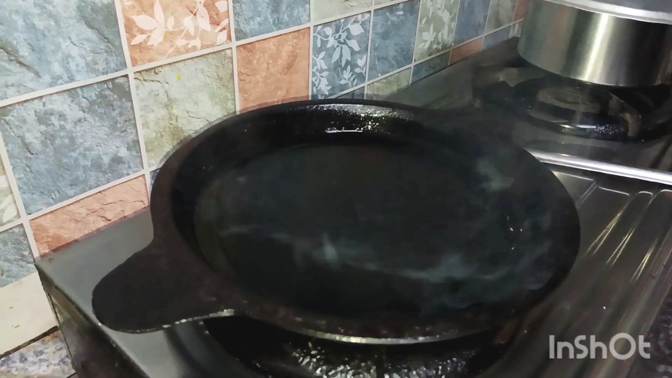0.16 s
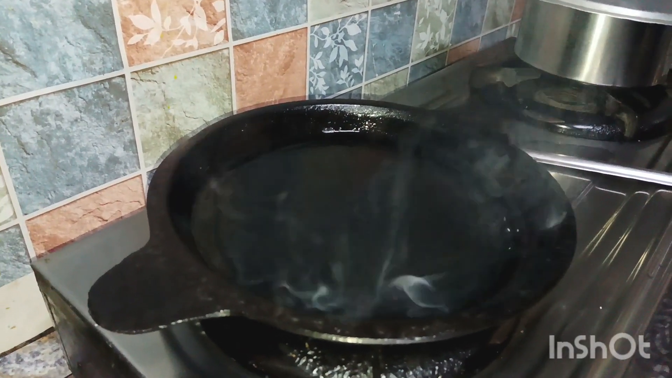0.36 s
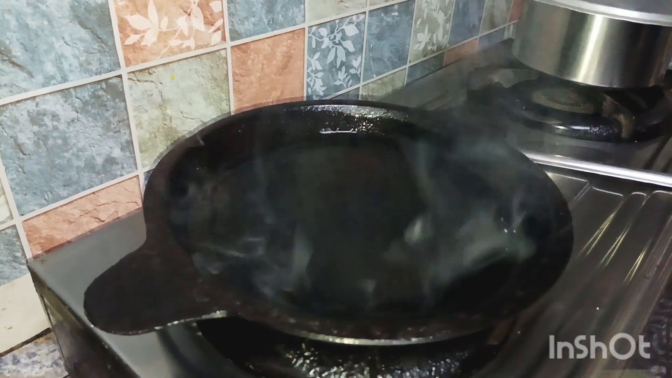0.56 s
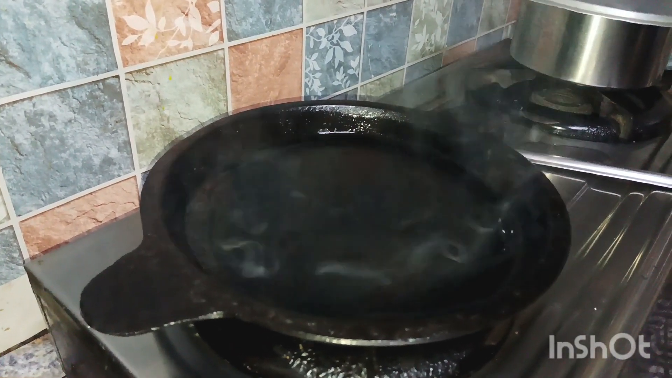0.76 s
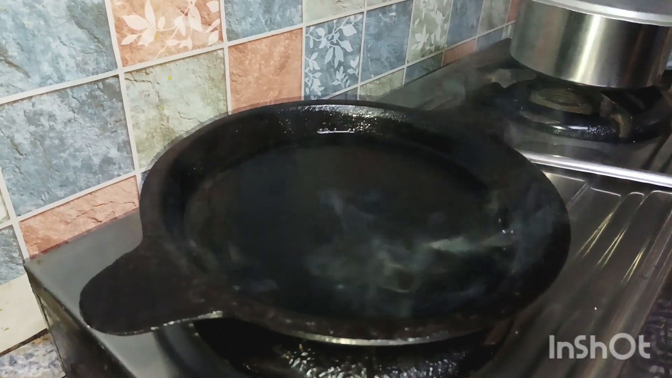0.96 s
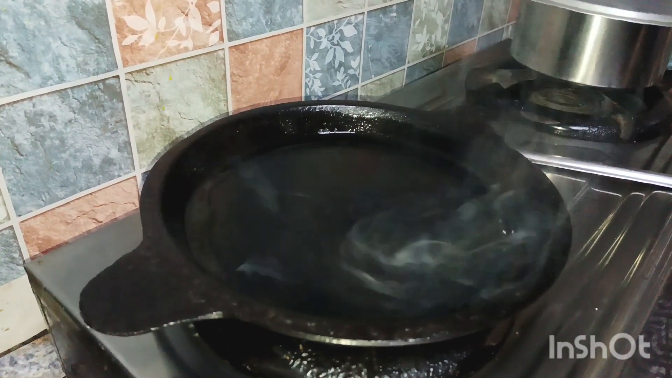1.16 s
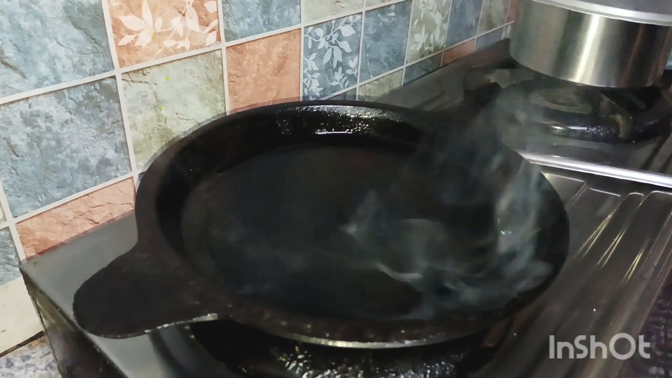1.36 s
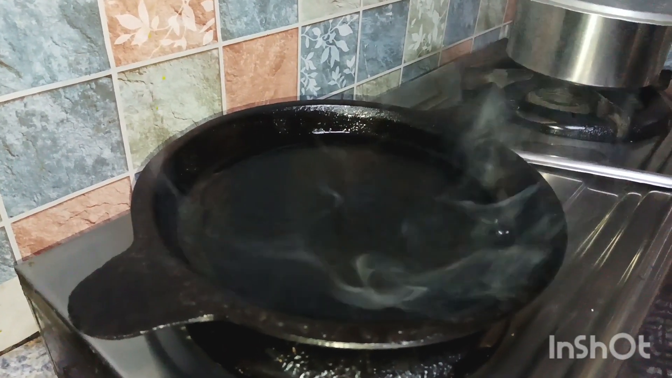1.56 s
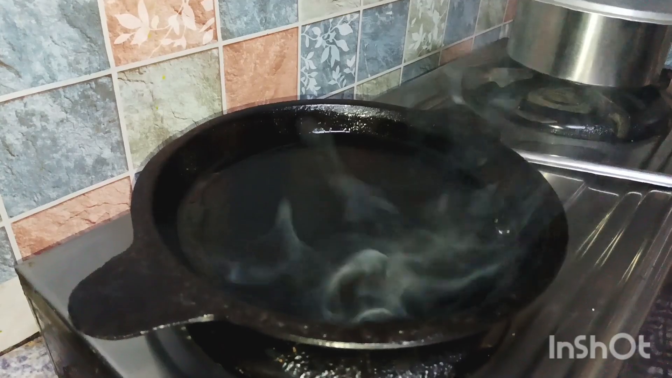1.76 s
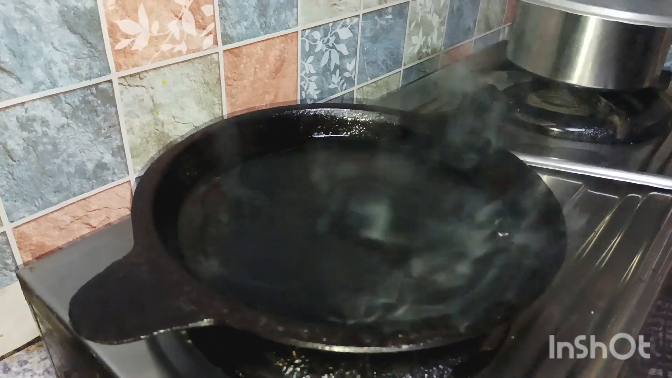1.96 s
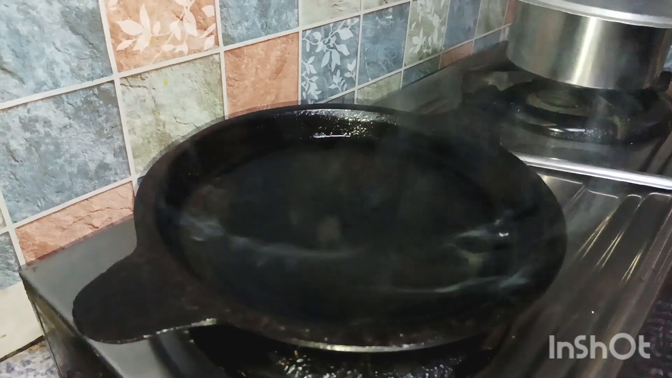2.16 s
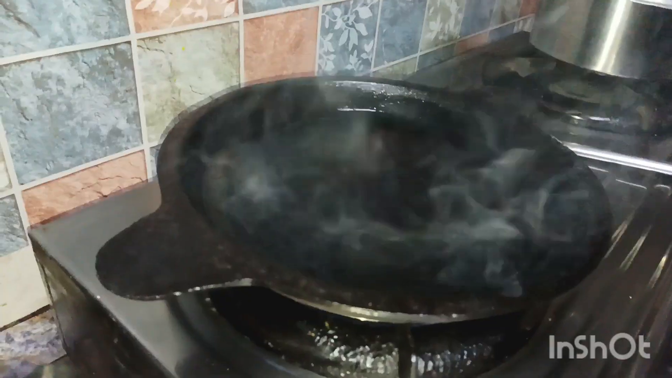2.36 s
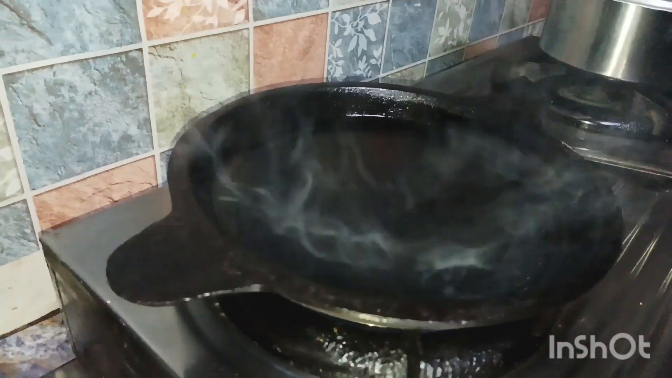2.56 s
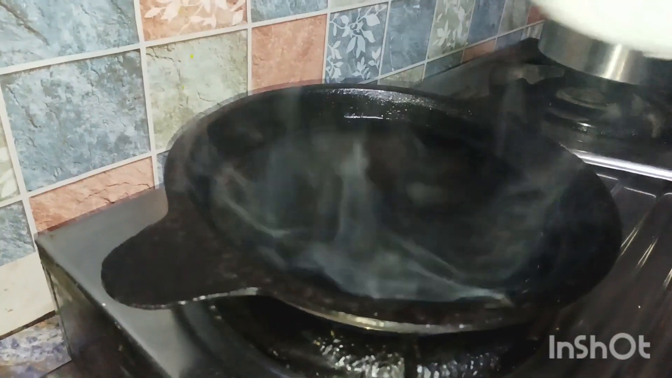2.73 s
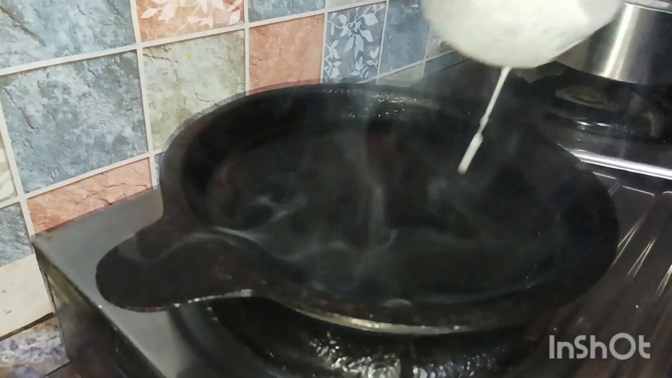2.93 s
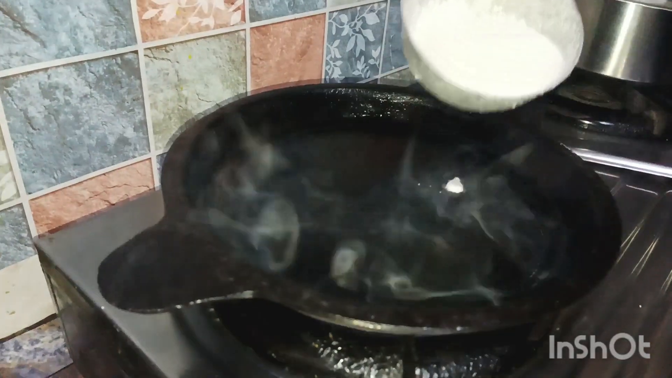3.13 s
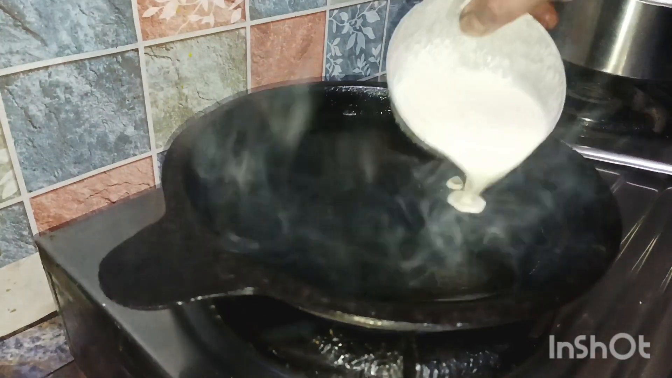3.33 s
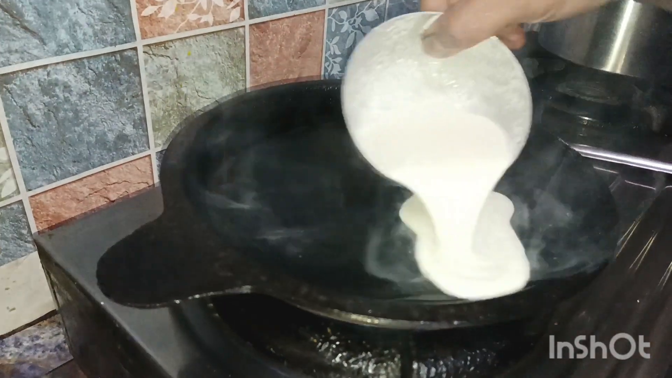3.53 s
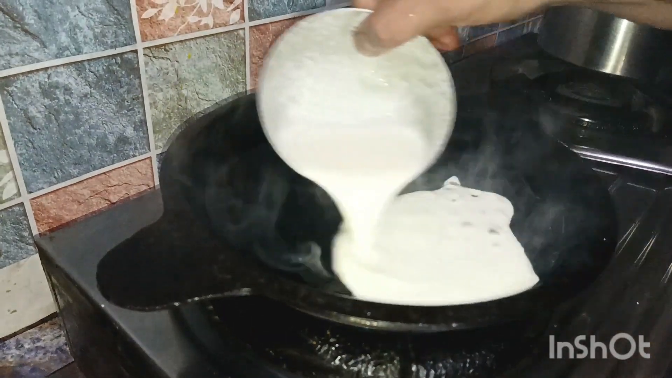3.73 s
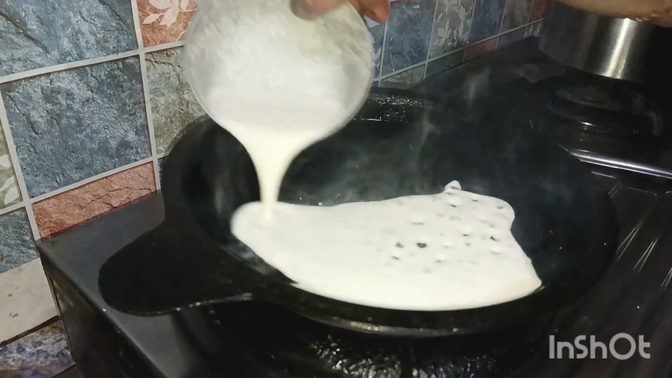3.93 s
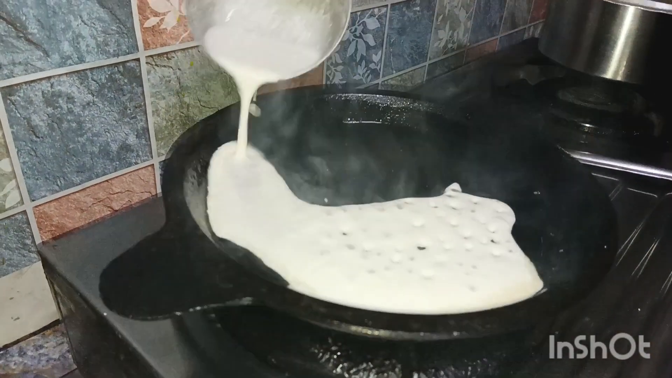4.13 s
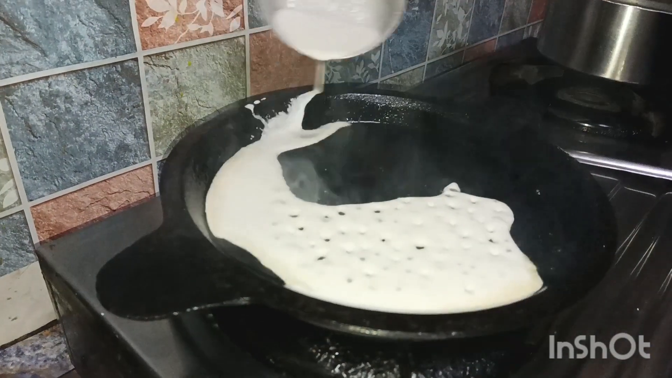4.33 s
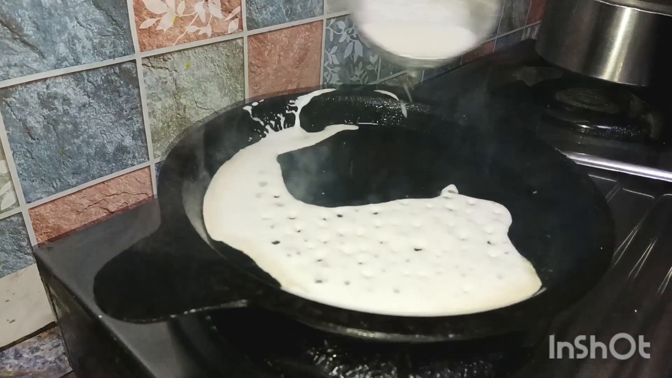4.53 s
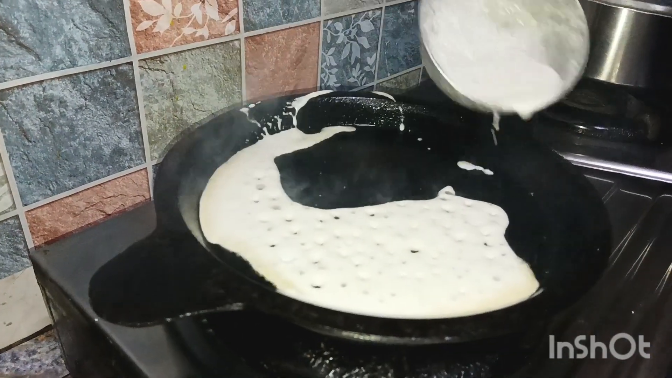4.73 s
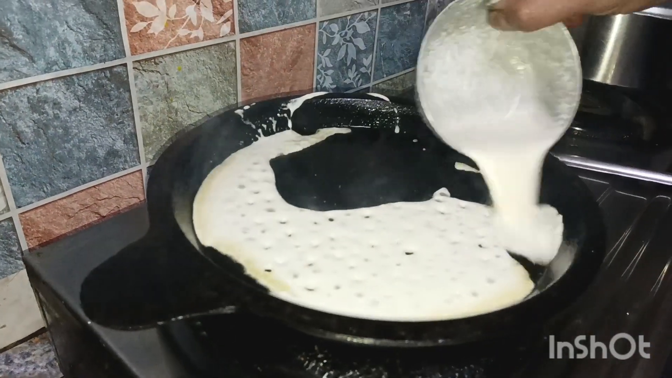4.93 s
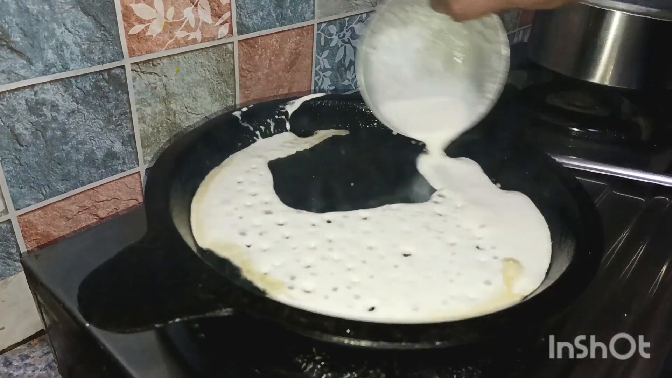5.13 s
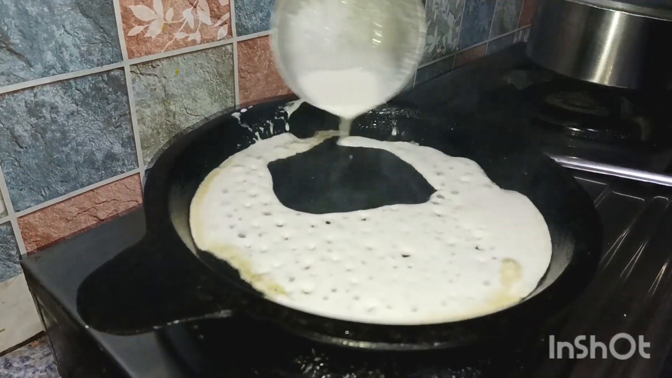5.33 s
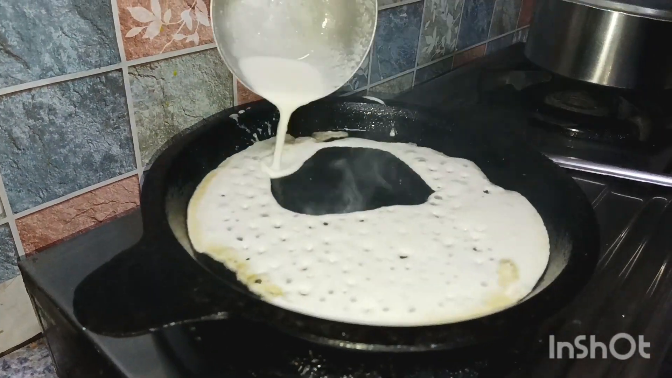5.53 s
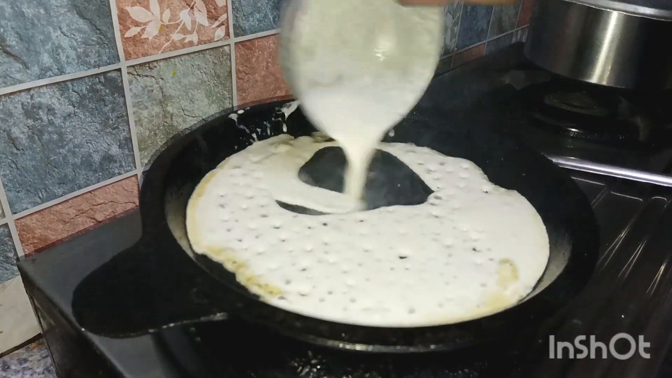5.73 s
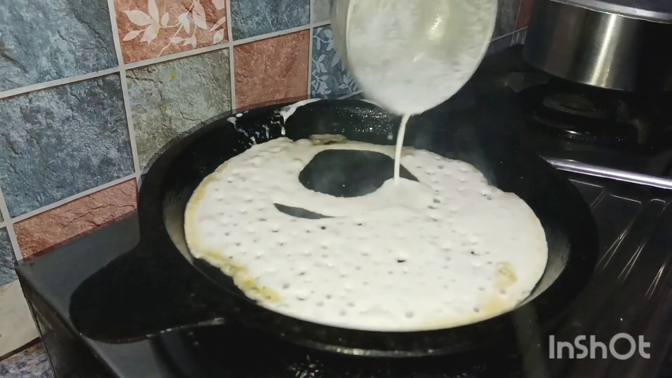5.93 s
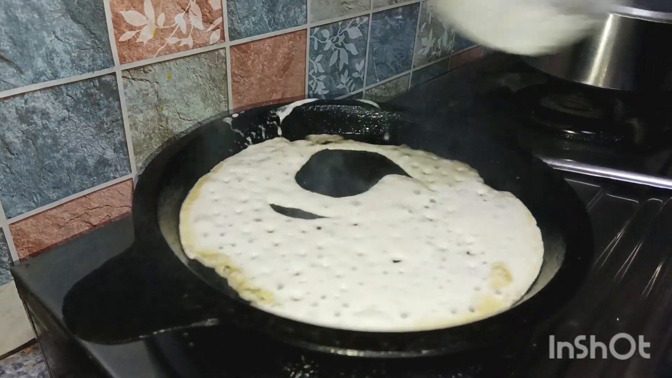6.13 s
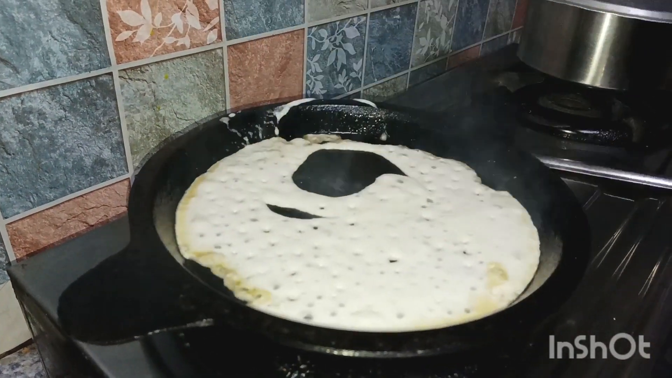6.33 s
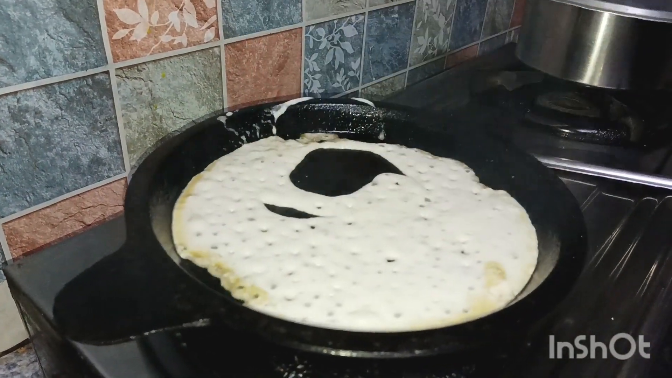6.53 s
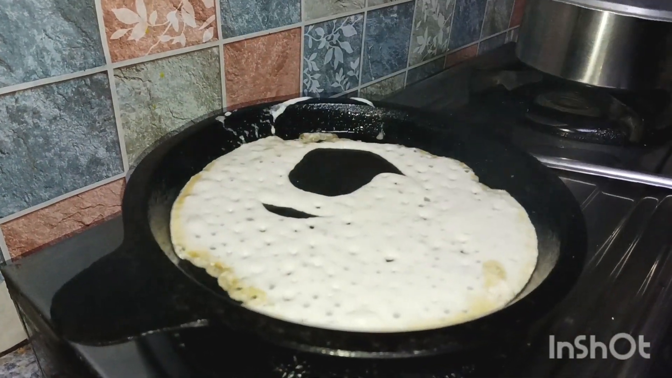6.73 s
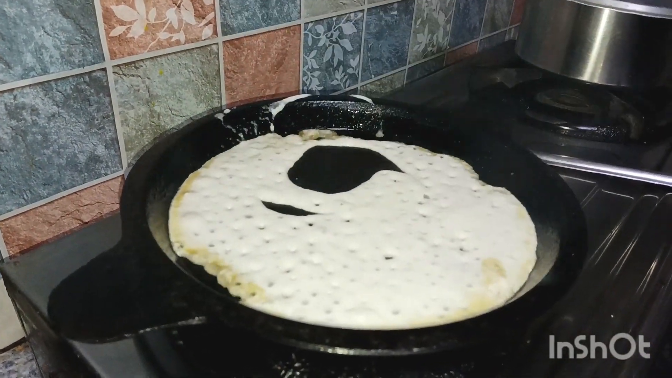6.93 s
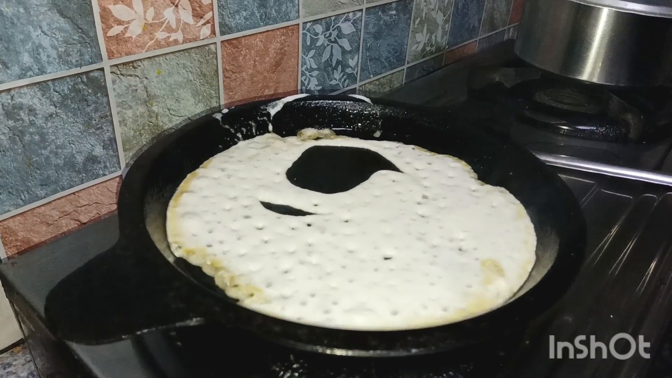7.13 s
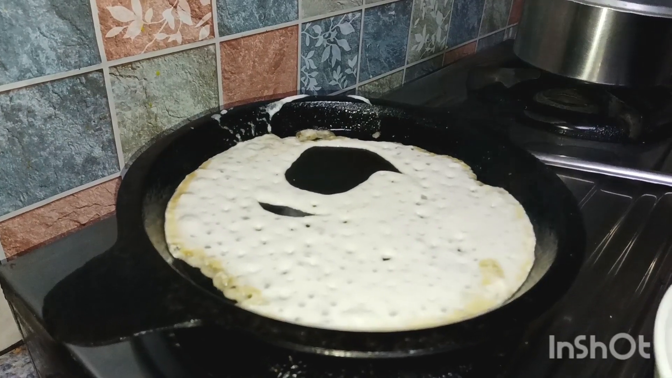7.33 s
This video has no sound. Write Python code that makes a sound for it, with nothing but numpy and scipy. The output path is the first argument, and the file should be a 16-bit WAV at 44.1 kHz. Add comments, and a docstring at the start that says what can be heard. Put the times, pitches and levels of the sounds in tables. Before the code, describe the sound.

For the first 2.5 seconds a quiet kitchen bed is heard: a steady low motor hum, the soft midrange rush of a gas flame with a restless rumble and occasional dull throbs, and very faint fizzing of oiled iron, slightly livelier near 0.9 and 2 s. Around 2.6 s a first tiny splash hisses briefly. At about 2.95 s a drop flashes into a sharp, ringing hiss, and from 3.3 s poured batter sizzles loudly, fine high spitting first, then denser frying and lower bubbling. It subsides through 4 to 4.5 s. A second round of pouring raises fresh sizzles from 4.5 to about 5.6 s, with short steam spurts. From 6 s the sizzle thins into a calming crackle over the flame and hum, with tiny clicks and, around 6.6 to 7.3 s, small light knocks. The sound is close, with short bright reflections from tiles.

```python
"""A motor hums and a gas burner rushes as sums of sines and shaped noise; oiled iron fizzes faintly.
A first splash hisses briefly; then batter is poured on in two rounds and sizzles loudly, calming as it sets.
At each wetting random bubble bursts, shaped into bands, flash and then simmer, the tiniest starting first.
Very short sine clicks and short filtered noise bursts punctuate the sizzle.
Tiles echo the bubbles, and the gap behind the griddle rings."""
import sys
import numpy as np
from scipy import signal
from scipy.fft import rfft, irfft, next_fast_len
from scipy.io import wavfile
from scipy.ndimage import uniform_filter1d, map_coordinates

SR = 44100
rng = np.random.default_rng(int(sys.argv[2]) if len(sys.argv) > 2 else 0)


def file_out(sig):
    """Save sig as 16-bit WAV at sys.argv[1]."""
    # one column per channel
    cols = np.atleast_2d(sig).T
    # limit, then scale
    lim = np.clip(cols, -1, 1)
    pcm = np.round(lim * 32767).astype(np.int16)
    wavfile.write(sys.argv[1], SR, pcm)


N = 329868

# motor tones: f/Hz, rms level/dB, waver/dB
MOTOR_TONES = [(98.7, -55.5, 0.5), (219.6, -39.5, 0.85), (439, -60.5, 3.5), (660, -51.5, 1.1)]
# relative spectrum of the flame's rush: f/Hz, density/dB
FLAME_SPECTRUM = [(100, -70), (400, -22), (600, -12), (690, -5.5), (790, 2), (920, -4), (1160, -11),
                  (1400, -13), (1550, -8.5), (1680, -12), (1900, -7), (2700, -7), (2950, -9.5), (3750, -12),
                  (4050, -20), (4800, -25), (6200, -24.5), (8300, -32), (10200, -40.5), (15800, -50)]
# relative spectrum of the burner's rumble: f/Hz, density/dB
RUMBLE_SPECTRUM = [(25, -47), (48, -33), (70, -14.5), (100, -9.5), (135, -15), (160, -9), (185, -0.5),
                   (212, -2.5), (255, -17), (310, -12.5), (400, -21), (490, -26.5), (580, -23), (700, -52)]
# soft low throbs of the fluttering flame: t/s, rms level at the crest/dB
FLAME_THROBS = [(.79, -34), (1.41, -41), (1.66, -41), (1.841, -39), (2.94, -42), (3.55, -35), (3.98, -34),
                (4.74, -37), (6.28, -37)]
# moments when the oil fizzes more: t/s, rise of the driving level/dB, Gaussian half-length/s
OIL_FLARES = [(.85, 5, .04), (1.38, 2.5, .2), (2.02, 5, 0.13)]
# relative spectrum of the sizzle: f/Hz, density/dB
SIZZLE_SPECTRUM = [(400, -14), (560, -12.5), (760, -6.5), (1000, -7), (1500, 1), (3000, -2), (3700, -3),
                   (4600, -8.5), (5300, -6.5), (6200, -3), (7500, -3.5), (8400, -6.5), (9400, -13.5),
                   (13500, -18), (15800, -19.5)]
# short noise bursts, steam hisses and late knocks perhaps of the bowl being handled:
# t/s, rms level at the crest/dB, f/Hz, resonance width/Hz, Gaussian half-length/s
NOISE_SPURTS = [(3.054, -31, 3170, 148, 0.05), (3.12, -42, 1590, 493, 0.044),
                (3.304, -35.5, 700, 44.8, 0.15), (4.597, -34, 8500, 4000, 0.028),
                (4.679, -36, 5750, 250, 0.096), (4.68, -45, 8900, 250, 0.12),
                (5.372, -26.5, 1420, 202, 0.028), (6.642, -31.5, 3500, 4000, .04),
                (6.985, -32.5, 6200, 1500, .008), (7.007, -32, 3100, 900, 0.025),
                (7.195, -29, 6000, 6000, 0.006), (7.242, -32, 2500, 2030, 0.039),
                (7.271, -29.5, 5550, 4530, 0.016)]
# very short clicks of tiny bubbles, mostly high: t/s, level before a common gain/dB, f/Hz, decay time/s
BUBBLE_POPS = [(1.759, -18.5, 2600, 0.0001), (4.7838, -15, 7240, 0.00028), (5.4595, -20, 10400, .0003),
               (6.7895, -26, 12500, .0005), (6.8445, -23, 14000, 0.00018), (7.025, -22, 7000, .0002)]
# batter wetting fresh hot iron: t/s, strength/dB, spreading time/s, largest bubbles over smallest/dB
WETTINGS = [(2.57, -16, 0.042, -14.5), (2.933, 4, 0.19, .5), (3.304, 0.84, 0.14, -0.5),
            (3.69, -8.8, 0.086, 10), (4.515, -3.5, 0.14, -2.5), (4.686, -10, 0.12, 13),
            (4.967, -6.5, 0.16, 11), (5.118, -10.5, .031, 2.5), (5.263, -2.5, .17, -4.5),
            (5.587, -13, .073, -8), (6.148, -20, .07, -3)]
# driving level of each bubble size, from smallest to largest:
# delay/s, flash level/dB, flash power decay/s, simmer level/dB, simmer power decay/s
SPIT_RESPONSE = (0, -27.5, 0.1, -38.7, 1.53)
FIZZ_RESPONSE = (0.0357, -16.5, 0.113, -34, 2)
FRY_RESPONSE = (0.03, -18.5, 0.14, -32.4, 1.34)
BOIL_RESPONSE = (0.12, -29, 0.2941, -40, 1.9)
# resonances between griddle and tiles: f/Hz, width/Hz, lift at the first drop/dB, lift for spread batter/dB
GAP_RESONANCES = [(700, 26, 10, -3), (802, 17, 9, 4.5), (1385, 24, 2, 1.5), (1553, 31, 3, 3),
                  (1808, 32, 2, 7), (1980, 24, -14, 5), (2077, 24, 13.5, 0.5), (2350, 16, 7.5, 2.5),
                  (2535, 39, 7.5, -5), (2742, 78, 0, 4.5), (2950, 77, -1, 3.5), (3090, 65, 9.5, 4.5),
                  (3570, 45, 6, -4), (4300, 81, 11, -3), (4900, 59, 7.5, 2.5), (5750, 120, 9, -0.5),
                  (7360, 99, 8, -0.5), (8300, 68, 3, 3), (8200, 51, 4, 0.5), (9000, 84, 8, 1),
                  (10520, 320, 4.5, -1.5)]
# mix of the two sets of lifts: t/s, share of the spread-batter set (0-1)
SPREAD_SHARE = [(2.6, 0.6), (3.05, 0.3), (3.55, 0.13), (3.75, 0.5), (4.1, .96)]

FLAME_DB, RUMBLE_DB = -40, -42.5  # mid levels of rush and rumble
OIL_DRIVE_DB = -60.5
FIRST_CONTACT_S, CONTACT_RISE_S = 2.6, 0.005
TOP_HZ = 15780


def amp(db):
    """Logarithmic level: decibels to amplitude gain."""
    return 10 ** (np.asarray(db) / 20)


def unit(x):
    """Normalisation of signal power: scale to rms 1."""
    return x / np.sqrt(np.mean(x ** 2) + 1e-20)


def clock():
    """Uniform sampling: the time of every sample in seconds."""
    return np.arange(N) / SR


def bump(centre_s, half_length_s):
    """Gaussian envelope: a smooth rise and fall with crest 1."""
    return np.exp(-((clock() - centre_s) / half_length_s) ** 2)


def wobble(rate):
    """Band-limited random modulation: a smooth curve through `rate` random knots a second."""
    knots = rng.standard_normal(4096)
    return map_coordinates(knots, [clock() * rate], mode="mirror")


def colour(points, hz):
    """Spectral envelope: gain of (Hz, dB) points joined on a logarithmic frequency axis."""
    f, db = np.transpose(points)
    return amp(np.interp(np.log(hz + 1), np.log(f), db))


def resonance(hz, centre, width):
    """Damped oscillator: a causal resonance with gain 1 at its centre."""
    return 1j * hz * width / (centre ** 2 - hz ** 2 + 1j * hz * width)


def band(hz, lo, hi):
    """Band-pass with steep edges: power falls to half at each edge."""
    below = (lo / (hz + 1)) ** 16
    above = (hz / hi) ** 16
    return 1 / np.sqrt((1 + below) * (1 + above))


def filtered(x, response):
    """Linear filtering: the spectrum of x times a response of frequency."""
    size = next_fast_len(N + SR // 2)
    hz = np.fft.rfftfreq(size, 1 / SR)
    return irfft(rfft(x, size) * response(hz), size)[:N]


def noise(response):
    """Source and filter: white noise coloured by a response, at rms 1."""
    return unit(filtered(rng.standard_normal(N), response))


def patchy(x, depth_db):
    """Random spectral modulation: narrow bands swell and fade, a tenth of a second at a time."""
    spectra = signal.stft(x, nperseg=1024)[2]
    field = rng.standard_normal(spectra.shape)
    field = uniform_filter1d(field, size=3, axis=0)  # neighbouring frequencies
    field = uniform_filter1d(field, size=9, axis=1)  # neighbouring moments
    # the offset keeps the mean power about constant
    gain_db = depth_db * unit(field) - depth_db ** 2 / 9
    return signal.istft(spectra * amp(gain_db), nperseg=1024)[1][:N]


def kitchen(x, wet_db, t60):
    """Diffuse reverberation: tiles and steel answer each burst with a short decaying noise tail."""
    t = np.arange(SR // 4) / SR
    tail = rng.standard_normal(len(t)) * amp(-60 * t / t60) * (t > 0.001)
    tail = tail / np.linalg.norm(tail)
    return x + amp(wet_db) * signal.oaconvolve(x, tail)[:N]


def bursts(rate, spread_db):
    """Poisson-like impulses: bubbles burst at random moments, with log-normal sizes capped above."""
    happens = rng.random(N) < rate / SR
    size = amp(spread_db * np.minimum(rng.standard_normal(N), 2.5))
    return happens * size * rng.choice([-1, 1], N) / np.sqrt(rate)


def swarm(drive_db, lo_hz, hi_hz, rate, spread_db, flutter_db, wet_db):
    """Impulse noise of one bubble size: the drive raises both the gain and the density of bursts."""
    density = rate * amp(drive_db - drive_db.max())
    train = bursts(density, spread_db) * amp(flutter_db * wobble(45))
    # the liveliest spot wanders over the griddle, and each patch has its own echo
    patches = np.arange(7)
    place = 2.5 * clock() + 0.45 * rng.standard_normal(N)
    patch = np.round(place) % len(patches)
    heard = sum(kitchen(train * (patch == k), wet_db, t60=0.23) for k in patches)
    shaped = filtered(heard, lambda hz: colour(SIZZLE_SPECTRUM, hz) * band(hz, lo_hz, hi_hz))
    return amp(drive_db) * unit(shaped)


def motor():
    """Additive synthesis: hum tones share a slight pitch drift, and each wavers in strength."""
    turn = clock() + np.cumsum(0.00096 * wobble(3.88)) / SR
    hum = np.zeros(N)
    for hz, db, waver_db in MOTOR_TONES:
        level = np.sqrt(2) * amp(db + waver_db * wobble(7))
        hum += level * np.sin(2 * np.pi * (hz * turn + rng.random()))
    return hum


def burner():
    """Flow noise: the gas flame rushes above a low, restless rumble and flutters in throbs."""
    rush = patchy(noise(lambda hz: colour(FLAME_SPECTRUM, hz)), depth_db=2.5)
    rush = amp(FLAME_DB + 0.73 * wobble(12)) * rush
    rumble = noise(lambda hz: colour(RUMBLE_SPECTRUM, hz) * band(hz, 20, 800))
    rumble = amp(RUMBLE_DB + 1.9 * wobble(9)) * rumble
    swell = sum(amp(db) * bump(s, 0.027) for s, db in FLAME_THROBS)
    throb_hz = 180 + 7 * wobble(18)
    throb = np.sqrt(2) * np.sin(2 * np.pi * np.cumsum(throb_hz) / SR)
    return rush + rumble + swell * throb


def oil():
    """Sparse impulse noise: the greased iron fizzes faintly on its own."""
    flares_db = sum(db * bump(s, length) for s, db, length in OIL_FLARES)
    return swarm(OIL_DRIVE_DB + flares_db, 3400, 9300, rate=2800, spread_db=3, flutter_db=3.0, wet_db=0)


def spurts():
    """Resonant noise: short bursts as steam hisses, and late knocks perhaps of the bowl being handled."""
    out = np.zeros(N)
    for s, db, centre, width, length in NOISE_SPURTS:
        burst = noise(lambda hz: resonance(hz, centre, width) ** 2)
        out += amp(db) * bump(s, length) * burst
    return out


def pops():
    """Transient oscillation: a tiny bubble snaps in a very short, mostly high click, with an echo."""
    out = np.zeros(N)
    half = SR // 200
    t = np.arange(-half, half) / SR
    for s, db, hz, length in BUBBLE_POPS:
        snap = amp(db) * np.exp(-np.abs(t) / length) * np.sin(2 * np.pi * hz * t)
        start = round(s * SR) - half
        out[start:][:len(t)] += snap
    return kitchen(amp(6.5) * out, wet_db=-7, t60=0.15)


def bubbling(size_response, coarseness):
    """Addition of powers: the wettings' sum drives one bubble size (coarseness -.5 fine, .5 coarse)."""
    delay_s, flash_db, flash_s, simmer_db, simmer_s = size_response
    power = 1e-6  # floor that keeps the logarithm finite
    for s, db, spread_s, coarse_db in WETTINGS:
        age = np.maximum(clock() - s - delay_s, 0)
        wetted = 1 - np.exp(-(age / spread_s) ** 2)
        flash = amp(flash_db) ** 2 * np.exp(-age / flash_s)
        simmer = amp(simmer_db) ** 2 * np.exp(-age / simmer_s)
        strength = amp(db + coarseness * coarse_db) ** 2
        power = power + strength * wetted * (flash + simmer)
    return 10 * np.log10(power)


def gap_response(hz, lifts_db):
    """Cascaded resonances: the gap lifts or cuts the sound around each of its tones."""
    centres, widths = np.transpose(GAP_RESONANCES)[:2]
    response = 1
    for centre, width, db in zip(centres, widths, lifts_db):
        response = response * (1 + (amp(db) - 1) * resonance(hz, centre, width))
    return response


def nook(x):
    """Cavity coupling: the gap by the tiles rings differently for the first drop and spread batter."""
    first_db, later_db = np.transpose(GAP_RESONANCES)[2:]
    share = np.clip(np.interp(clock(), *np.transpose(SPREAD_SHARE)), 0, 1)
    first = amp(-3.0) * filtered(x, lambda hz: gap_response(hz, first_db))
    later = amp(-1.2) * filtered(x, lambda hz: gap_response(hz, later_db))
    return (1 - share) * first + share * later


def sizzle():
    """Flash boiling: water turns to steam under the batter, from fine spitting to thick boiling."""
    sizes = [SPIT_RESPONSE, FIZZ_RESPONSE, FRY_RESPONSE, BOIL_RESPONSE]
    coarseness = np.linspace(-0.5, 0.5, len(sizes))
    spit_db, fizz_db, fry_db, boil_db = map(bubbling, sizes, coarseness)
    spit = swarm(spit_db, 9600, 18000, rate=11000, spread_db=9.5, flutter_db=1.0, wet_db=0)
    fizz = swarm(fizz_db, 4000, 10000, rate=14000, spread_db=6.5, flutter_db=1.0, wet_db=1.0)
    fry = swarm(fry_db, 1930, 4360, rate=11000, spread_db=3.3, flutter_db=1.13, wet_db=0.5)
    boil = swarm(boil_db, 516, 1674, rate=4000, spread_db=4.5, flutter_db=0.3, wet_db=4)
    # larger bubbles vent through pores that each sing briefly at their own pitch
    coarse = patchy(fry + boil, depth_db=2.0)
    contact = np.clip((clock() - FIRST_CONTACT_S) / CONTACT_RISE_S, 0, 1)
    return contact * nook(spit + fizz + coarse)


def scene():
    """Superposition: all sources add at one microphone, the same in both channels."""
    mono = motor() + burner() + oil() + spurts() + pops() + sizzle()
    return np.array([mono, mono])


def record(dry):
    """Ideal low-pass: nothing passes above the band limit."""
    return np.array([filtered(channel, lambda hz: hz < TOP_HZ) for channel in dry])


dry = scene()
out = record(dry)
file_out(out)
```